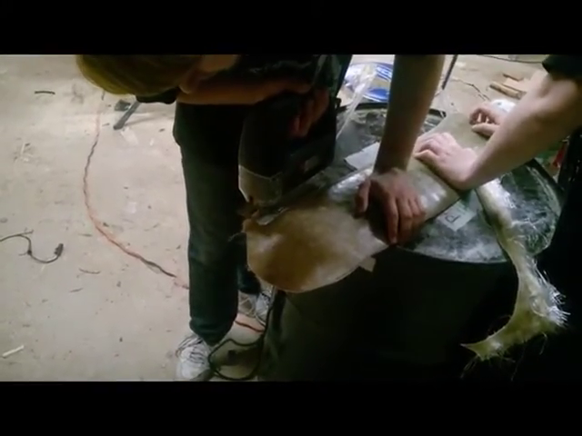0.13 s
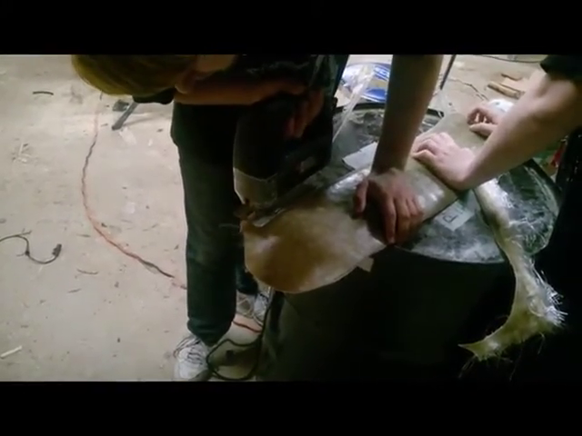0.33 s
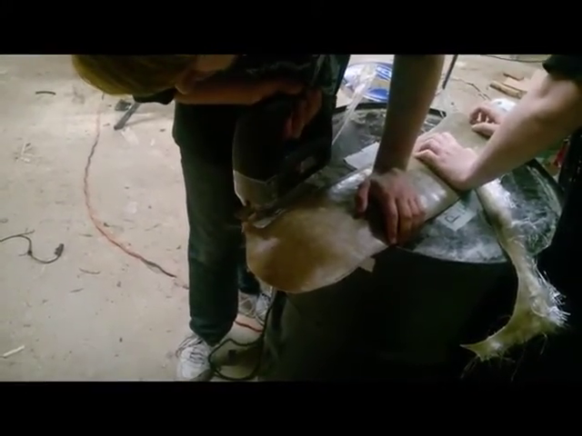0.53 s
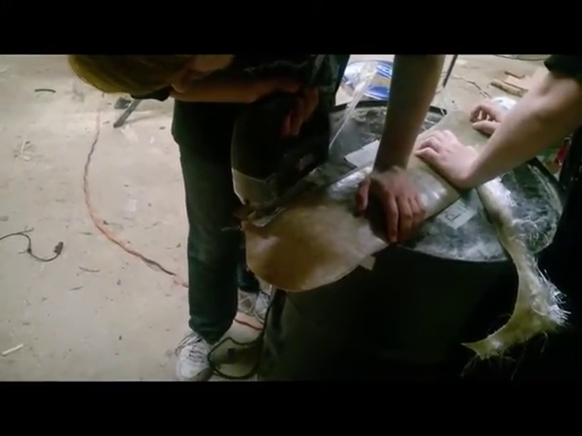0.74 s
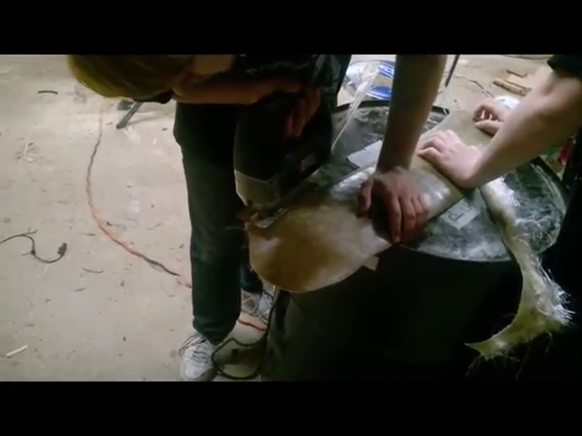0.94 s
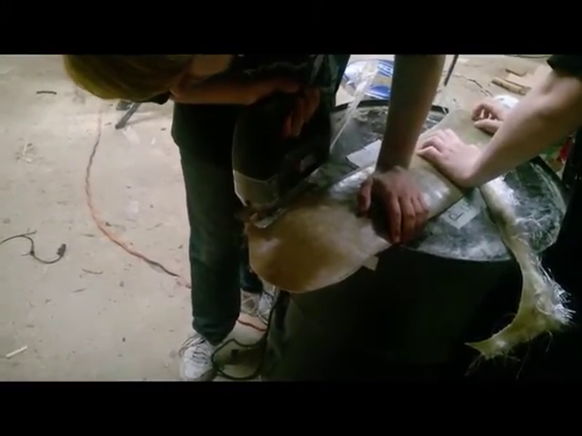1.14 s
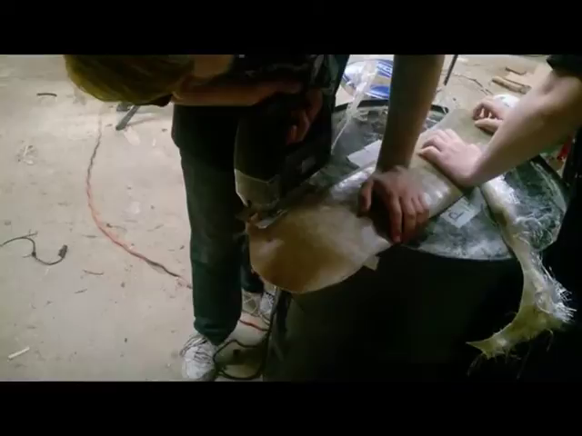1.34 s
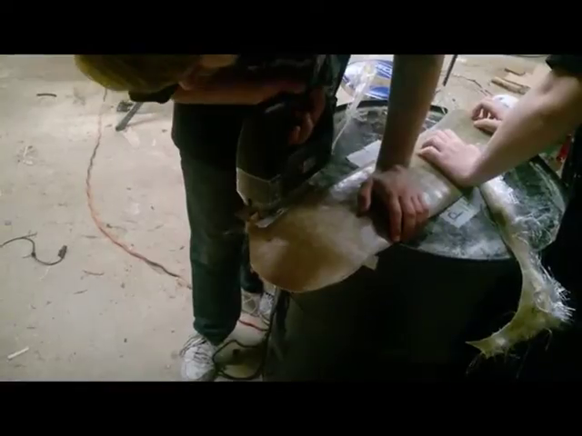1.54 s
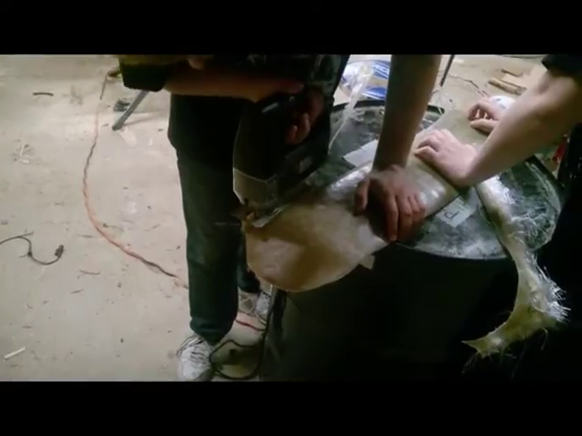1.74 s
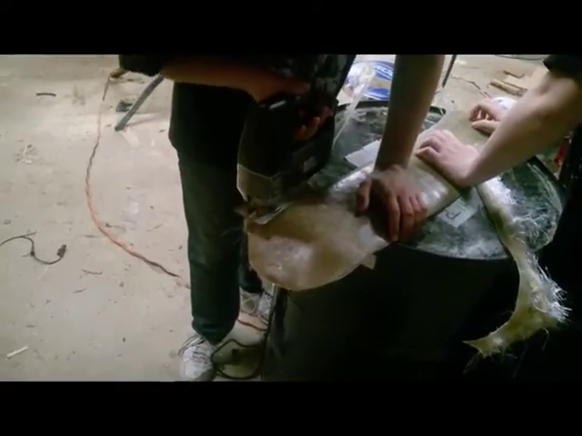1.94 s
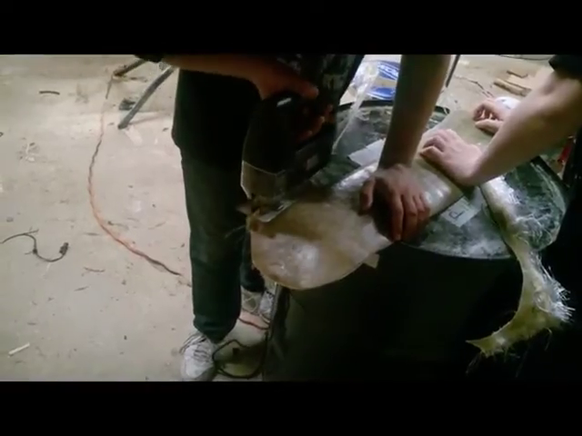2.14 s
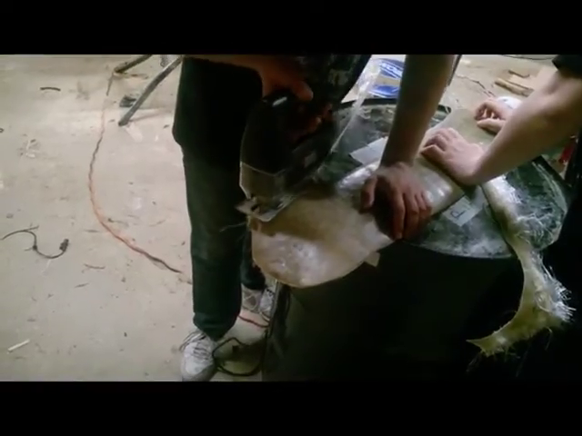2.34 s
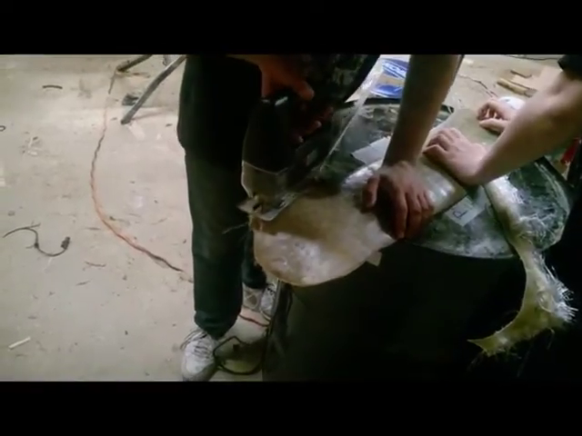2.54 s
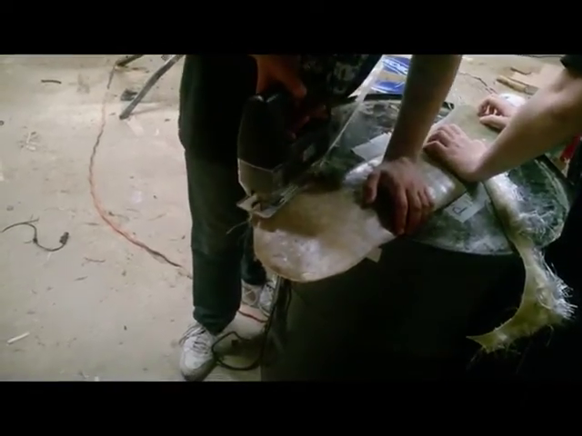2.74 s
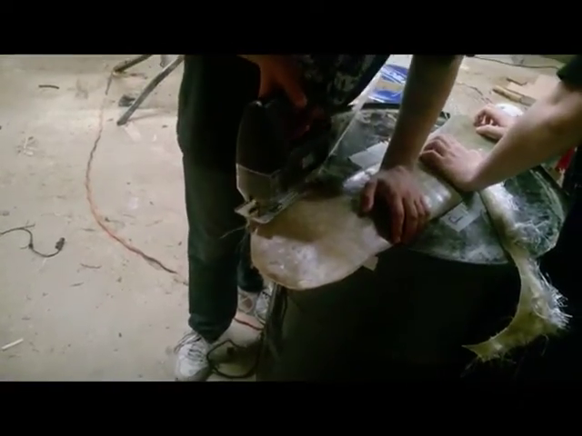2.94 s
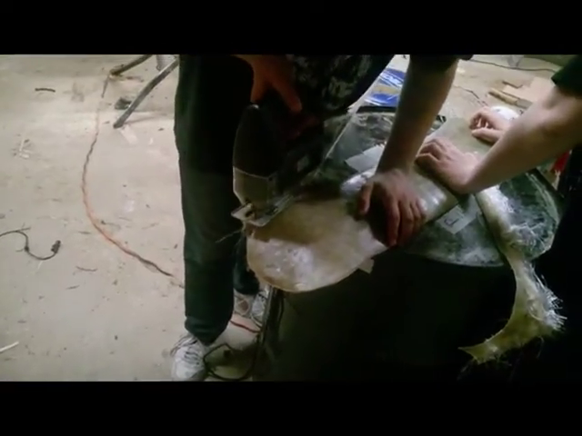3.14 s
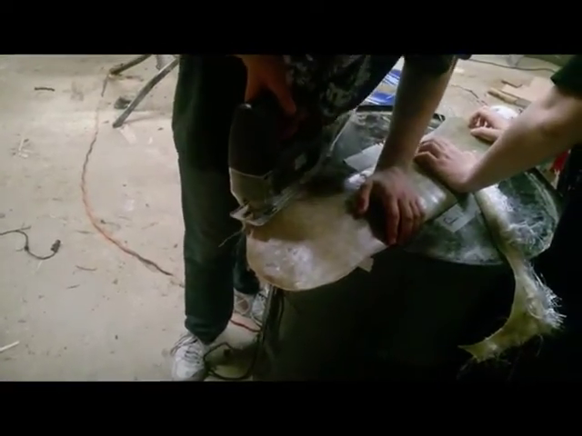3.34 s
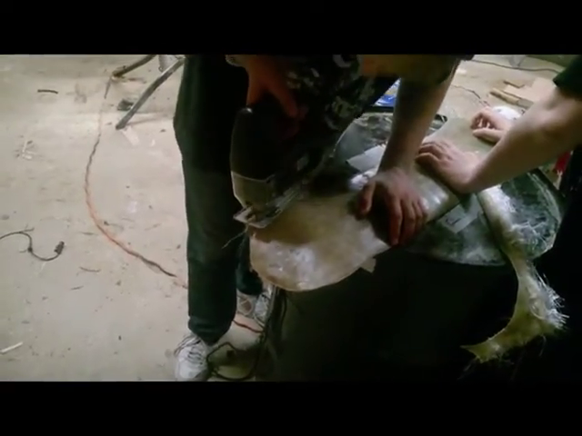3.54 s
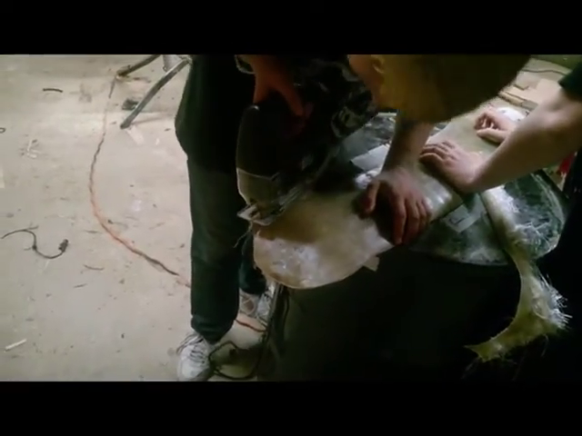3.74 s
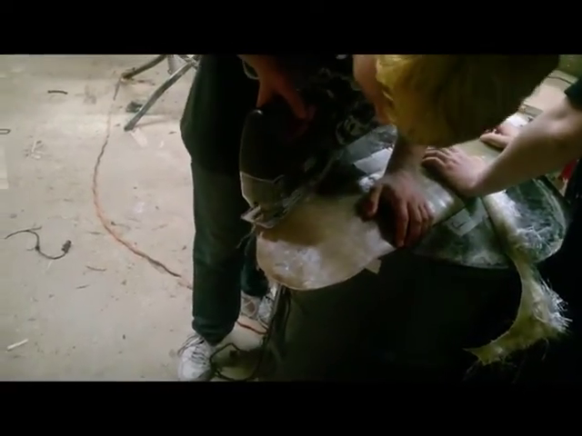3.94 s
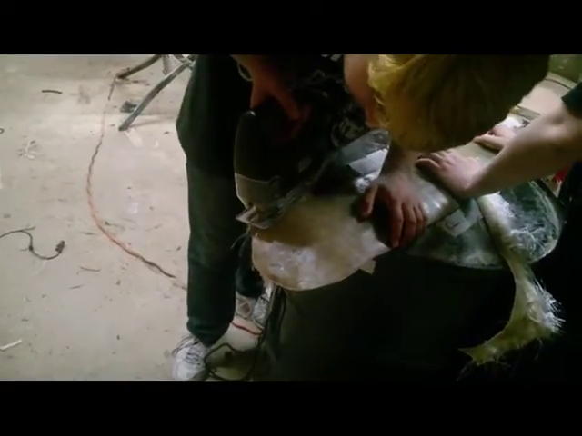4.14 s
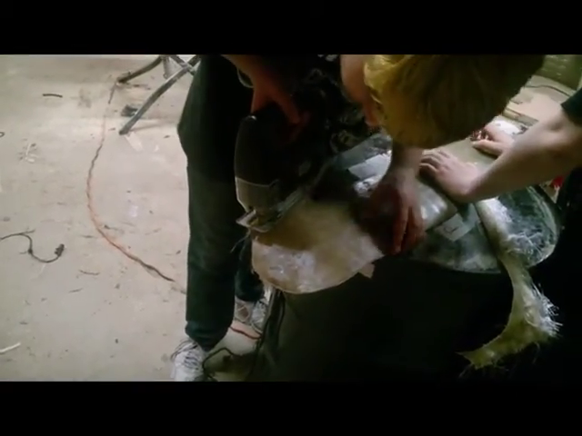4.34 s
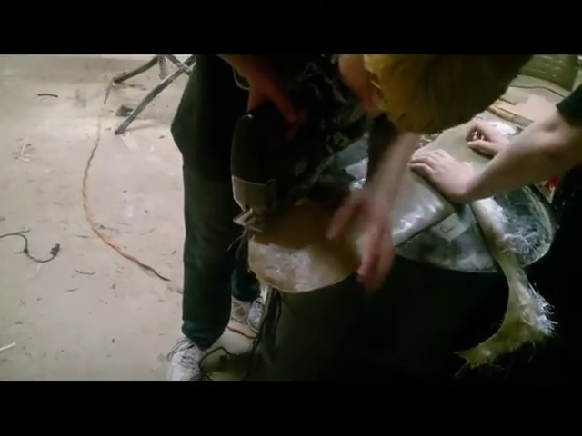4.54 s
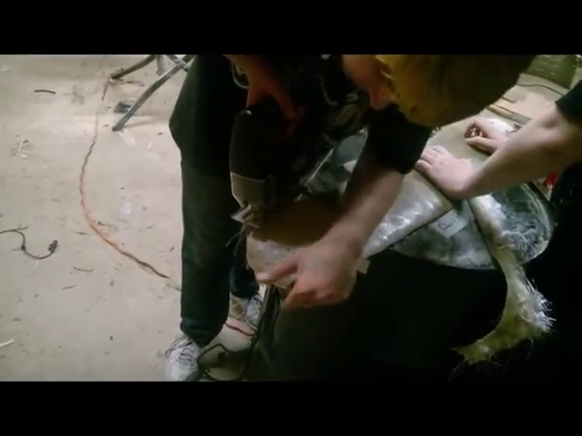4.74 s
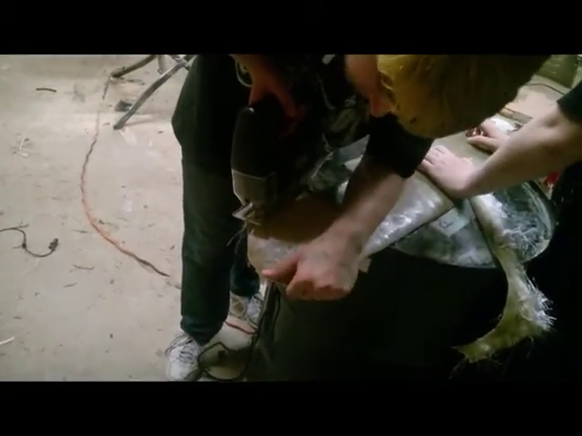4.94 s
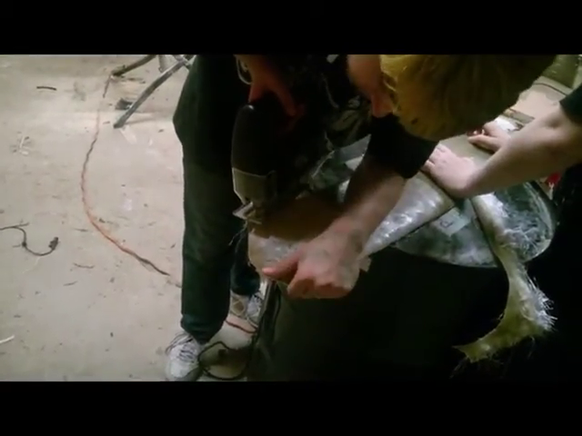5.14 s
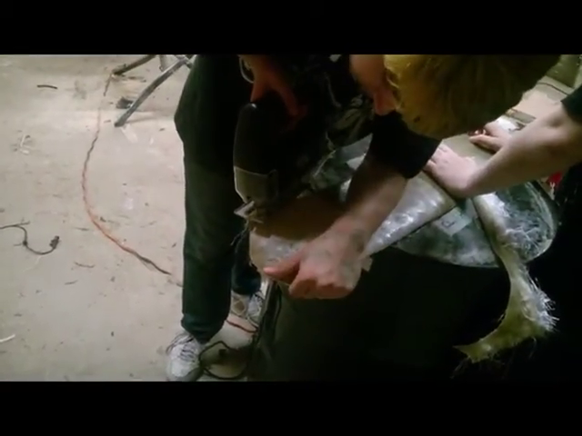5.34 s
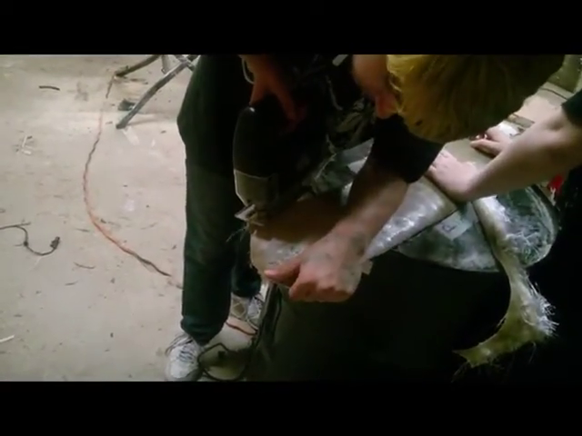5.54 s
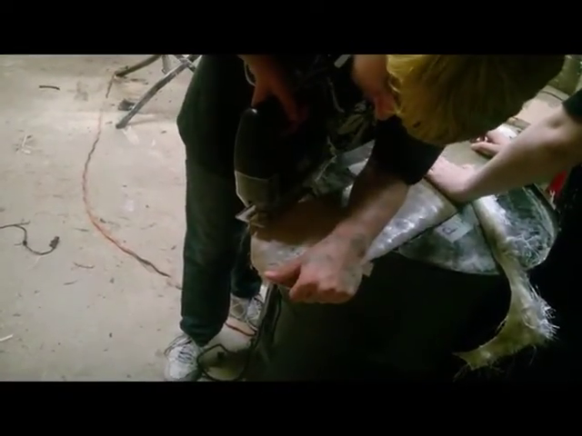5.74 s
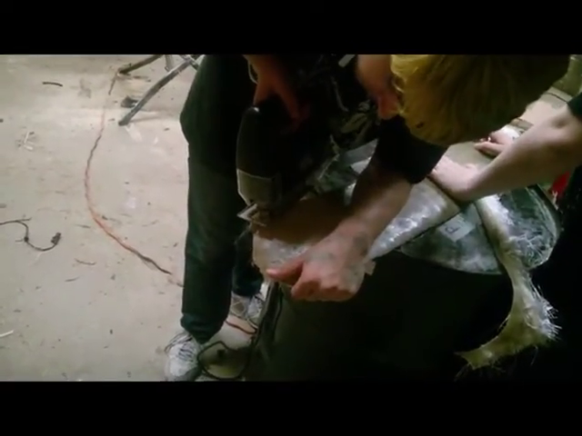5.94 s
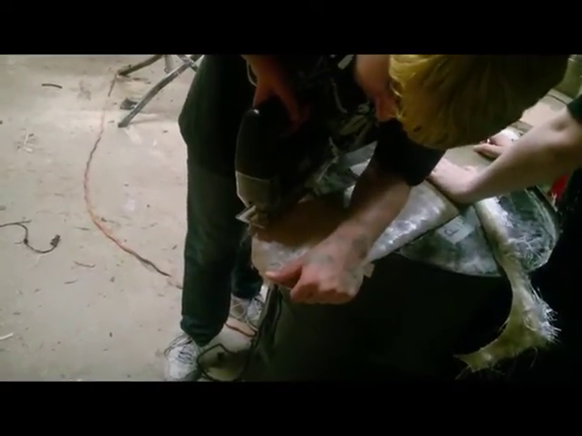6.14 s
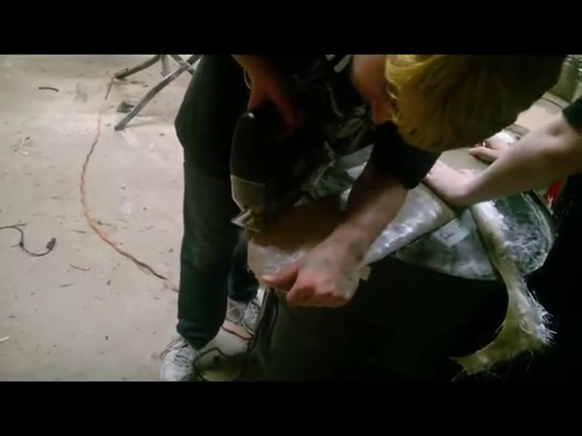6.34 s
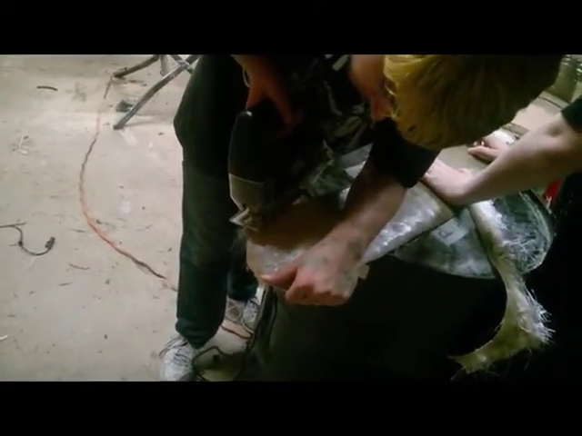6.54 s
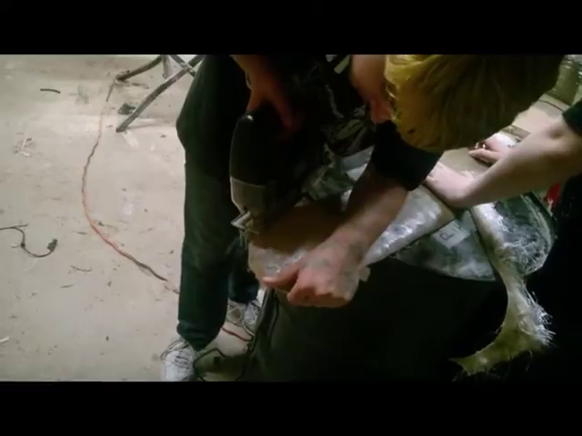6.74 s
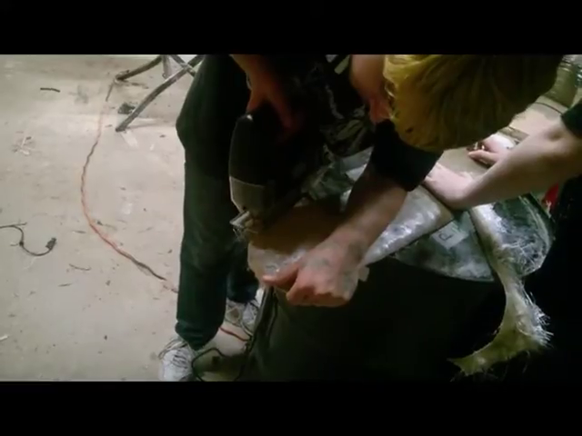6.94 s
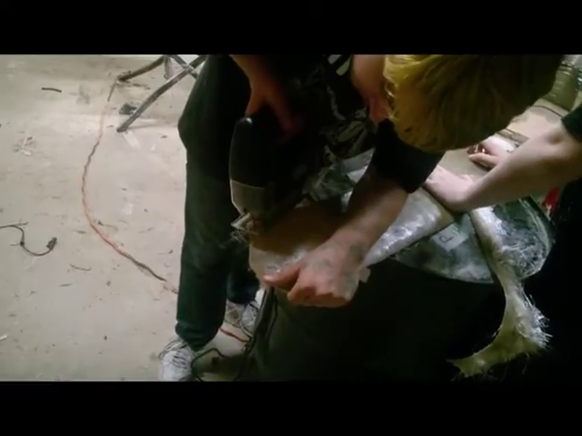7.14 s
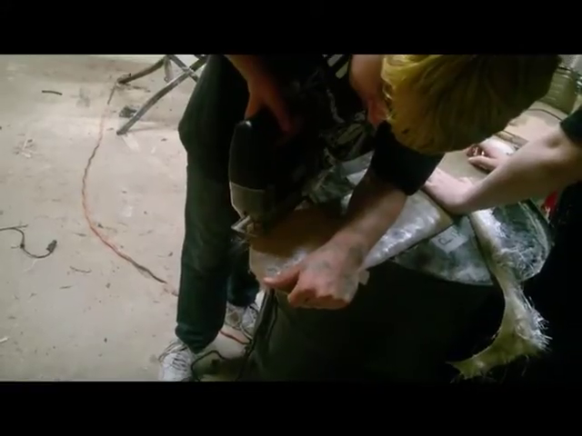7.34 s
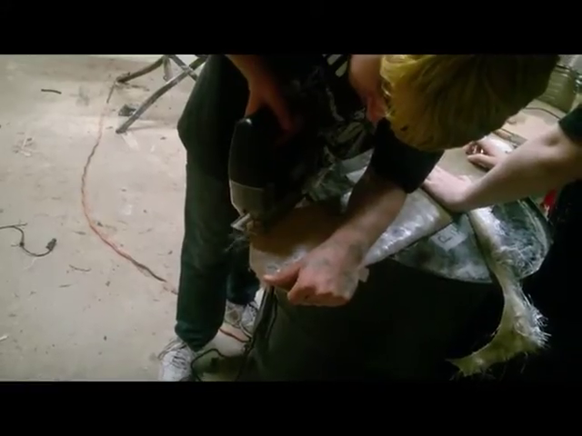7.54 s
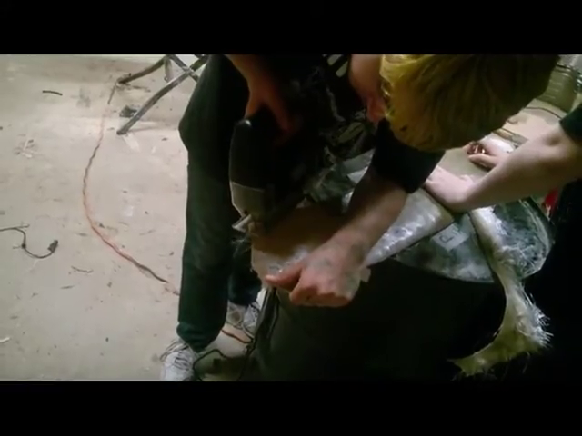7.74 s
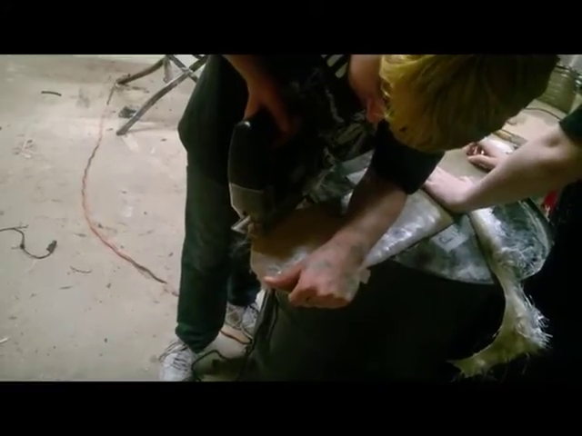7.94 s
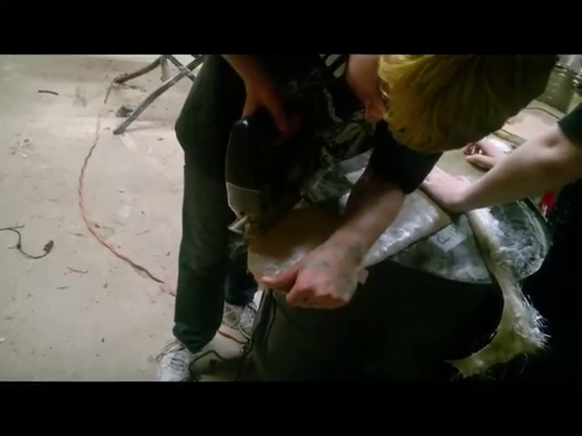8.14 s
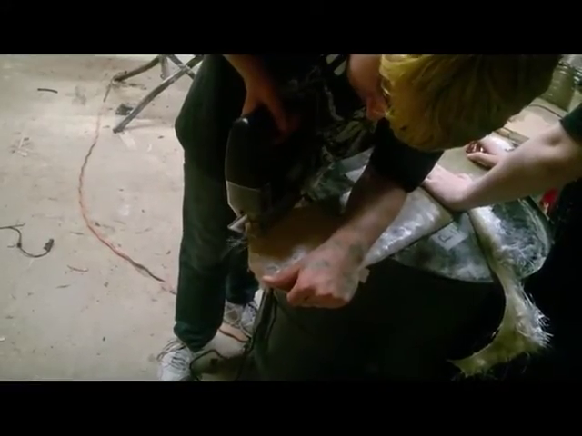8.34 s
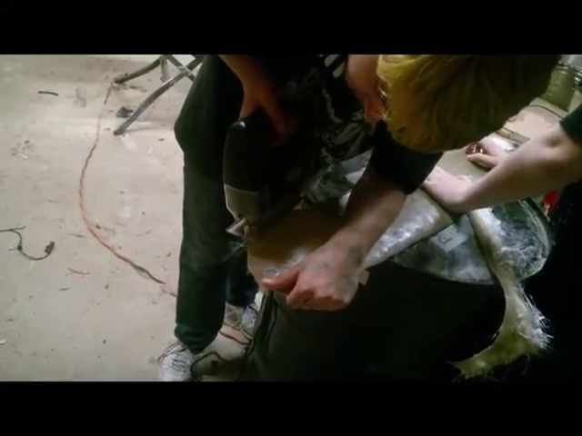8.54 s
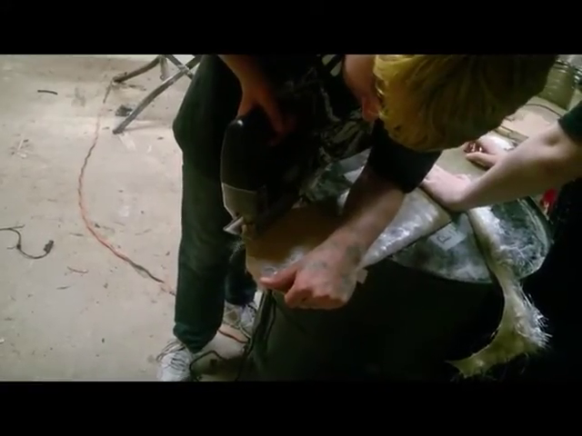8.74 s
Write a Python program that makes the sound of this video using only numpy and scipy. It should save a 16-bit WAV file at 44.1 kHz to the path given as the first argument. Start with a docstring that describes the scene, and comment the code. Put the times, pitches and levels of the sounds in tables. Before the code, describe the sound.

An electric jigsaw chatters through a hard fibreglass board, winds down with slowing knocks, pauses briefly, then starts cutting again.

```python
"""An electric jigsaw cuts a fibreglass board in a workshop, about 54 strokes a second. The teeth rattle
the board, the shoe (the saw's base plate) slaps it and its underside thrums, while the gears whine, the
fan hisses and the bench shudders. At 1.25 s the trigger is let go: the saw coasts, its blade knocking in
the slot, until it sticks at 3.7 s. The pause holds a faint scuff and the click of the trigger.
At 5.23 s the saw starts again, knocks a few times as it speeds up, and cuts on to the end."""
import sys
import numpy as np
from scipy import signal
from scipy.fft import rfft, irfft, next_fast_len
from scipy.io import wavfile
from scipy.ndimage import uniform_filter1d

SR = 44100
rng = np.random.default_rng(int(sys.argv[2]) if len(sys.argv) > 2 else 0)


def digitize_waveform(pressure):
    """Quantize a signal to 16-bit integers and store it at the path in sys.argv[1].

    Rows of a 2-D input are taken as channels; values are limited to [-1, 1].
    """
    field = np.atleast_2d(pressure).T
    bounded = np.clip(field, -1, 1)
    quanta = np.round(bounded * 32767).astype(np.int16)
    wavfile.write(sys.argv[1], SR, quanta)


N = 387198
TIME = np.arange(N) / SR
OFF_S, ON_S = 1.249, 5.23   # trigger let go, pressed again
FULL_SPEED = 54   # strokes a second; one stroke is one turn of the crank
BITE_AT = .76   # the teeth bite hardest about this many turns after the shoe slaps

# Speed under power, higher when the saw is pushed less. Each row: time in seconds, strokes a second.
POWERED_SPEED = [(0, 54.13), (1.25, 53.98), (6.6, 53.89), (7.05, 53.97), (7.35, 54.78), (7.65, 54.69),
                 (7.95, 55.15), (8.35, 54.4), (8.78, 54.18)]
def crank():
    """Speed and turns of the crank that drives the blade: powered, coasting, then speeding up again."""
    held = in_time(POWERED_SPEED)[0]
    friction, fan_drag = 10.36, .01109   # speed lost each second = friction + fan_drag * speed ** 2
    jam_s, jam_fade_s = 3.72, .17   # the slow blade sticks in the slot
    balance = np.sqrt(friction / fan_drag)   # speed at which both losses are equal
    left = np.arctan(held[int(OFF_S * SR)] / balance) - np.sqrt(friction * fan_drag) * (TIME - OFF_S)
    coasting = balance * np.tan(np.clip(left, 0, 1.5)) * np.exp(-np.maximum(TIME - jam_s, 0) / jam_fade_s)
    since = np.maximum(TIME - ON_S, 0)
    kick_share, kick_s, climb_s = .275, .02421, .2487   # a quick kick, then a slower climb
    climbing = held * (1 - kick_share * np.exp(-since / kick_s) - (1 - kick_share) * np.exp(-since / climb_s))
    speed = np.select([TIME < OFF_S, TIME < ON_S], [held, coasting], climbing)
    turns = np.cumsum(speed) / SR
    to_rest_angle = (.64 - turns[int(ON_S * SR)]) % 1   # the restart begins .64 of the way round
    return speed, turns + (TIME >= ON_S) * to_rest_angle


def teeth(stroke, speed):
    """Force of the cut: the same teeth meet the board every stroke, slowly wearing, plus fresh chips."""
    size, wear = 816, TIME / .35   # points in a stroke's pattern; it blends into a new one every .35 s
    patterns = rng.standard_normal((int(wear[-1]) + 2, size)) * from_db(7.5 * rng.standard_normal((1, size)))
    row, place, blend = wear.astype(int), (stroke % 1 * size).astype(int), wear % 1 * np.pi / 2
    repeating = rms_one(np.cos(blend) * patterns[row, place] + np.sin(blend) * patterns[row + 1, place])
    chips = rms_one(noise() * from_db(4 * noise()))
    strengths = from_db(.99 * rng.standard_normal(int(stroke[-1]) + 3))
    per_stroke = strengths[(stroke + 1.5 - BITE_AT).astype(int)]
    cutting = np.clip(speed / FULL_SPEED, 0, 1) ** 3.6   # a coasting blade only rubs
    rub = .5 - .1 * cutting * (TIME > ON_S)   # the second cut rubs less and bites harder
    bite = np.where(TIME > ON_S, 2.2, 1.2) * stroke_pulse(stroke, BITE_AT - .03, 10)
    light_bite = .1 * stroke_pulse(stroke, BITE_AT + .4, 5)
    return (rub + cutting * per_stroke * (bite + light_bite)) * (.51 * cutting * repeating + .99 * chips)


# The pitches at which the board rings. Each row: pitch in Hz, width in Hz (wider dies away sooner),
# then its level in dB at each of the three times in BLADE_PLACES_S.
BOARD_RINGS = [(565, 62, -8.5, -2.5, 0.5), (731, 50, -8.5, 7, -37), (883, 140, -13, 1, 2.5),
               (1016, 63, -1, 6, 5), (1178, 70, 1, 0, 6), (1395, 46, 0.5, -9.5, 15),
               (1655, 98, -5.5, -24, 7), (1880, 53, 0.5, -1.5, 11), (2028, 150, -3.5, -9.5, 5),
               (2221, 91, 1.5, 3, 8), (2340, 44, 0.5, -19.5, -23), (3140, 215, 1.5, -5, -4),
               (4060, 790, -23, -45, -24), (6950, 810, -14, -40.5, -2.5)]
BLADE_PLACES_S = [2.1, 4.5, 8.88]   # times in seconds when the blade reaches three places along the cut
# The tone of the teeth's broad rasp. Each row: pitch in Hz, level in dB.
RASP_TONE = [(180, -50.5), (300, -30.5), (541, -16), (647, -14.5), (775, -2.5), (1820, -7), (3120, -6),
             (5530, -13.5), (15000, -30.5)]
def board(force, rasp_db):
    """A force makes the board rasp and ring; the mix of rings changes as the blade moves along."""
    sound = from_db(rasp_db) * colour(force, RASP_TONE)
    for k, (hz, width_hz, *db) in enumerate(BOARD_RINGS):
        gain = from_db(np.interp(TIME, BLADE_PLACES_S, db))
        sound += (-1) ** k * gain * resonance(force, hz, width_hz)
    return sound


# The pitches at which the shoe rings. Each row: pitch in Hz, width in Hz, level in dB.
SHOE_RINGS = [(1150, 300, 0), (2300, 800, -9), (5300, 900, -11), (7100, 500, -11), (11000, 900, -20)]
def shoe_slaps(stroke, slap_db):
    """Once a stroke the shoe hits the board: a push, a quick rebound, a short ring and a rattle."""
    at = np.flatnonzero(np.diff(np.floor(stroke)) > 0)
    hits = np.zeros(N)
    hits[at] = from_db(slap_db[at] + 1.6 * rng.standard_normal(len(at)))
    t = np.arange(int(.006 * SR)) / SR
    push = np.exp(-((t - .0002) / .00007) ** 2)
    rebound = .5 * np.exp(-((t - .0011) / .00009) ** 2)
    ring = sum(from_db(db) * np.exp(-np.pi * width_hz * t) * np.cos(2 * np.pi * hz * (t - .0002))
               for hz, width_hz, db in SHOE_RINGS) * (t > .0001)
    slap = keep_band(.4 * (push + rebound) + .55 * ring, "high", 350)
    rattle = np.convolve(hits, np.exp(-t / .0024))[:N] * noise()
    return 1.25 * np.convolve(hits, slap / slap.max())[:N] + from_db(6) * board(rattle, rasp_db=-7)


# Knocks as the saw slows down or picks up. Each row: time in seconds, relative level in dB.
BLADE_KNOCKS = [(1.581, -13), (1.603, -9), (1.63, -22), (1.655, -6.5), (1.679, -11), (1.704, -11),
                (1.73, -10), (1.759, -9), (1.785, -7), (1.812, -7), (1.839, -9), (1.873, -10), (1.902, -6),
                (1.914, -14), (1.964, -5.5), (1.977, -17.5), (2.024, -9.5), (2.056, -7.5), (2.09, -16.5),
                (2.126, -15.5), (2.159, -17.5), (2.195, -11.5), (2.386, -21.5), (2.411, -27), (2.43, -11.5),
                (2.476, -11.5), (2.518, -14), (2.567, -10.5), (2.657, -18), (2.719, -18), (2.743, -17.5),
                (2.776, -12.5), (2.837, -14), (2.902, -14.5), (2.969, -16), (3.014, -21.5), (3.046, -21.5),
                (3.092, -23.5), (3.131, -18.5), (3.186, -22), (3.232, -19.5), (3.294, -23.5),
                (3.347, -21.5), (3.43, -28), (3.477, -24.5), (5.275, -19.5), (5.326, -14), (5.359, -10),
                (5.388, -17), (5.419, -15.5), (5.446, -17)]
def blade_knocks(speed):
    """The blade knocks on the board and its teeth scrape the slot; a slow blade is duller and longer."""
    rows = [(s, db, (FULL_SPEED / speed[int(s * SR)]) ** .31) for s, db in BLADE_KNOCKS]
    force = bursts([(s - .003, db, .0041 * stretch ** .5, .027 * stretch) for s, db, stretch in rows])
    scrape = bursts([(s - .013, db - 15.5, .013, .089 * stretch) for s, db, stretch in rows])
    hard, soft = (keep_band(force, "low", hz, order=1) for hz in (7000, 4000))
    hardness = np.clip(speed / 51, 0, 1)
    knock = board(hardness * hard + 1.29 * (1 - hardness) * soft, rasp_db=-3)
    return from_db(13.5) * (knock + from_db(1.5) * colour(scrape, HISS_TONE))


# The thrum for each way the board is held. Each row: start in seconds, then the levels in dB
# of the tones at 2, 3, 4 and 5 times the stroke rate.
THRUM_HOLDS = [(0, -47.5, -35.5, -37, -35.5), (.3, -47, -30.5, -41.5, -40.5),
               (1.25, -48, -34.5, -31.5, -35.5), (1.4, -49, -45, -36.5, -40.5), (1.7, -90, -90, -93, -90),
               (5.45, -50, -58, -48, -43), (6.09, -37.5, -42, -30.5, -44), (6.55, -39.5, -42, -35, -45),
               (6.86, -39, -52, -30.5, -43), (7.09, -61, -34.5, -43, -34.5), (7.41, -41, -35, -35, -57),
               (7.66, -54, -41, -48, -34.5), (8.03, -43, -35.5, -35.5, -47), (8.4, -45, -34.5, -36.5, -52)]
def board_thrum(turns):
    """The board's underside gives off low tones, whose levels glide from one hold to the next."""
    starts, *levels_db = np.transpose(THRUM_HOLDS)
    hold = np.searchsorted(starts, TIME, "right") - 1
    regrip_s = .08
    gains = [uniform_filter1d(from_db(db)[hold], int(regrip_s * SR)) for db in levels_db]
    return crank_tones(turns, np.arange(2, 6), 20 * np.log10(np.abs(gains) + 1e-9), waver_db=1.5)


# Tones at 6 to 24 times the stroke rate. Each row: relative level in dB in the first cut, in the second.
BUZZ_TONES = [(-14, -22), (-9, -8.5), (-23, -26), (-15.5, -11.5), (-7.5, -14), (-9, -7), (-20, -39),
              (-16.5, -9), (0, -4), (-5, -13.5), (-8.5, 1.5), (-5.5, -7), (-12, -4.5), (-5, -8), (-15, -32),
              (-9, -6.5), (-1, -13), (-7, 3), (-14.5, -26)]
def cutting_buzz(turns, speed):
    """Whatever repeats exactly from stroke to stroke makes a clean buzz, only near full speed."""
    levels_db = [np.where(TIME > ON_S, second, first) for first, second in BUZZ_TONES]
    tones = crank_tones(turns, np.arange(6, 25), levels_db, waver_db=2.2)
    return np.clip(speed / FULL_SPEED, 0, 1) ** 12 * tones


# The hiss of fan, brushes and gears; it also shapes the scrapes and the small sounds in the pause.
# Each row: pitch in Hz, level in dB.
HISS_TONE = [(180, -48), (300, -23), (517, -13.5), (907, -2.5), (985, -3), (2140, -6.5), (2440, -7.5),
             (5570, -8), (6680, -16), (8700, -19), (15500, -32.5)]
def motor_hiss(stroke, speed, board_db):
    """Fan and brushes hiss, louder with speed and hard cutting; the highs fade first as they slow."""
    hiss = colour(noise() * (.8 + .29 * stroke_pulse(stroke, BITE_AT + .05, 3.3)), HISS_TONE)
    highs, lows = keep_band(hiss, "high", 8000), keep_band(hiss, "low", 8000)
    brightness = np.clip(speed / FULL_SPEED, 0, 1) ** .69
    level_db = -22.5 + .31 * (board_db - board_db[0]) + .72 * drift(12)
    return from_db(level_db) * (speed / FULL_SPEED) ** 1.17 * rms_one(lows - brightness * highs)


# Whine at 1, 2 and 3 times the rate at which the gear teeth meet.
# Each row: relative level in dB in the first cut, while coasting, in the second cut.
WHINE_TONES = [(-31, -40, -34), (-40, -54, -44), (-39, -37, -41)]
# The housing lets some pitches out more than others. Each row: pitch in Hz, boost or cut in dB.
HOUSING_TONE = [(1000, -50), (2750, -18), (3600, -20), (4150, -6), (4600, -13), (5250, -1), (5500, 0),
                (5850, -5), (6250, 4), (6600, 5), (6900, -5), (7350, -5), (7850, 3), (8250, -6)]
GEAR_TEETH, HOUSING_HZ, HOUSING_WIDTH_HZ = 51, 5404, 272
def gearbox(turns, stroke, speed):
    """The gears whine, swelling once a stroke; slack in the crank taps the housing and makes it ring."""
    hz, housing_db = np.transpose(HOUSING_TONE)
    multiples = GEAR_TEETH * np.arange(1, 4)
    whine_db = [np.select([TIME < OFF_S, TIME < ON_S], db[:2], db[2])
                + np.interp(k * speed, [0, *hz], [-99, *housing_db])
                for k, db in zip(multiples, WHINE_TONES)]
    swell = .8 + .5 * stroke_pulse(stroke, BITE_AT, 2.5)
    whine = swell * crank_tones(turns, multiples, whine_db, waver_db=1.6)
    tap = rms_one(np.diff(np.floor(stroke - BITE_AT), prepend=0))
    rattle = rms_one(noise() * stroke_pulse(stroke, BITE_AT + .044, 1.9))
    ring = evened(resonance(.68 * tap + .43 * rattle, HOUSING_HZ, HOUSING_WIDTH_HZ))
    return whine + from_db(-31.5) * (speed / FULL_SPEED) ** 3.5 * ring


# The tone of the bench's shudder. Each row: pitch in Hz, level in dB.
SHUDDER_TONE = [(53, -33), (90, -8.5), (119, -5.5), (308, 1), (397, -8), (492, -10), (600, -4), (780, -31),
                (1320, -120)]
# Jolts to the bench. Each row: time of the peak in seconds, relative shudder level in dB,
# thud level in dB, half length in seconds.
BENCH_JOLTS = [(0.906, -45, -54, 0.036), (1.52, -36, -41, 0.11), (1.927, -47, -40.5, 0.18),
               (2.62, -42, -42, 0.23), (2.87, -55, -46, 0.11), (3.388, -57, -56, .04),
               (4.336, -60.5, -78.5, .04), (4.911, -74, -57.5, 0.052), (5.338, -50.5, -42.5, 0.066),
               (6.39, -27, -42, 0.025), (6.604, -27, -36, 0.046), (7.52, -45, -57, .05),
               (8.314, -40, -51, .04), (8.468, -44, -53, .04), (8.59, -37, -57, .04)]
def bench(shudder_db):
    """The bench shudders dully and thuds at its lowest pitch; both swell at each jolt."""
    shudder_gain, thud_gain = from_db(shudder_db), from_db(shudder_db - 25)
    for s, jolt_db, thud_db, half_s in BENCH_JOLTS:
        swell = np.exp(-((TIME - s) / half_s) ** 2)
        shudder_gain += from_db(jolt_db) * swell
        thud_gain += from_db(thud_db) * swell
    shudder = from_db(1.3 * drift(10) - 6.5) * rms_one(colour(noise(), SHUDDER_TONE, size=16384))
    thud = evened(resonance(resonance(noise(), hz=66, width_hz=24), hz=66, width_hz=24))
    return shudder_gain * shudder + thud_gain * thud


# Small sounds in the pause. Each row: start in seconds, relative level in dB, rise in seconds,
# seconds to fade by 60 dB.
PAUSE_SOUNDS = [(4.28, -62, 0.046, 0.26), (4.66, -82, 0.038, 0.4), (5.15, -82, 0.0032, 0.07),
                (5.219, -70.5, 0.0018, 0.036)]
def scuff_and_trigger():
    """A faint scuff and the trigger's clicks, each a short puff of noise."""
    return from_db(20.5) * colour(bursts(PAUSE_SOUNDS), HISS_TONE)


def room_echo(x, fade_s=.4, wall_cut_hz=2500):
    """Eight echoes bounce between the walls, quieter and duller on every round."""
    size = next_fast_len(N + SR)
    delay = np.exp(-2j * np.pi * np.arange(size // 2 + 1) / size)   # a delay of one sample
    dull, echoes = np.exp(-2 * np.pi * wall_cut_hz / SR), 0
    for k, lag in enumerate((rng.uniform(.015, .04, 8) * SR).astype(int)):
        loop = from_db(-60 * lag / SR / fade_s) * (1 - dull) / (1 - dull * delay) * delay ** lag
        echoes = echoes + (-1) ** k * loop / (1 - loop)
    return irfft(rfft(x, size) * echoes, size)[:N]


# The tone of the quiet workshop. Each row: pitch in Hz, level in dB.
BACKGROUND_TONE = [(12, -29), (20, -1), (49, -5), (116, -13), (180, -23), (649, -32.5), (725, -40.5),
                   (4950, -41.5), (7730, -50), (15500, -46)]
def background():
    """A faint, steady low rumble lies under everything."""
    return from_db(-68.5) * rms_one(colour(noise(), BACKGROUND_TONE, size=16384))


def noise():
    """Fresh white noise for the whole scene."""
    return rng.standard_normal(N)


def from_db(db):
    """Turn decibels into a number to multiply by."""
    return 10 ** (np.asarray(db) / 20)


def rms_one(x):
    """Scale a signal so its average strength (rms) is 1."""
    return x / np.sqrt(np.mean(x ** 2) + 1e-20)


def evened(x, size=4410):
    """Even out slow changes in loudness."""
    power = uniform_filter1d(uniform_filter1d(x ** 2, size), size)
    return x / np.sqrt(np.maximum(power, 0) + 1e-12)


def in_time(rows):
    """Join a table's timed rows with straight lines, giving one curve a column."""
    s, *columns = np.transpose(rows)
    return [np.interp(TIME, s, c) for c in columns]


def drift(rate_hz):
    """A slow random wander, about 1 in size."""
    r = np.exp(-80 * np.pi * rate_hz / SR)
    slow = signal.lfilter([1], [1, -2 * r, r * r], rng.standard_normal(N // 40 + 2002))[2000:]
    return np.interp(np.arange(N) / 40, np.arange(len(slow)), rms_one(slow))


def colour(x, tone, size=4096):
    """Shape a sound with a tone table, so that nothing rings before its cause (minimum phase)."""
    hz, db = np.transpose(tone)
    grid = np.maximum(np.arange(size // 2 + 1) * SR / size, 1)
    cepstrum = irfft(np.interp(np.log(grid), np.log(hz), db) * np.log(10) / 20)
    cepstrum[1:size // 2] *= 2
    cepstrum[size // 2 + 1:] = 0
    return signal.oaconvolve(x, irfft(np.exp(rfft(cepstrum))))[:N]


def keep_band(x, side, hz, order=2):
    """Keep the "low" or the "high" side of a pitch."""
    return signal.sosfilt(signal.butter(order, hz, side, fs=SR, output="sos"), x)


def resonance(x, hz, width_hz):
    """Let a sound ring at one pitch."""
    r = np.exp(-np.pi * width_hz / SR)
    gain = (1 - r * r) / 2
    return signal.lfilter([gain, 0, -gain], [1, -2 * r * np.cos(2 * np.pi * hz / SR), r * r], x)


def stroke_pulse(turns, at, sharpness):
    """A smooth bump once a stroke, `at` turns into it."""
    return np.exp(sharpness * (np.cos(2 * np.pi * (turns - at)) - 1))


def bursts(rows):
    """Puffs of noise that swell and die away."""
    envelope = np.zeros(N)
    for s, db, rise_s, fade_s in rows:
        t, start = np.arange(int(fade_s * SR)) / SR, int(s * SR)
        envelope[start:start + len(t)] += from_db(db - 60 * t / fade_s) * np.minimum(t / rise_s, 1)
    return envelope * noise() + 1e-18


def crank_tones(turns, multiples, levels_db, waver_db):
    """Pure tones at multiples of the stroke rate, each wavering in level."""
    return sum(np.sqrt(2) * from_db(db + waver_db * drift(9))
               * np.sin(2 * np.pi * (k * turns + rng.random())) for k, db in zip(multiples, levels_db))


# Where in the crank's turn the shoe slaps. Each row: time in seconds, angle in turns.
SLAP_ANGLE = [(0, .62), (.5, .52), (.75, .52), (1.3, .6), (1.65, .55), (5.85, .4), (6.15, .51), (7.2, .54),
              (8.1, .535), (8.78, .64)]
# How hard the saw works. Each row: time in seconds, then relative levels in dB of the board under
# the blade, the shoe's slap and the bench's shudder.
EFFORT = [(0, -18.5, -8.5, -37), (.33, -19, -9.5, -35), (1.15, -18.5, -8.5, -43), (1.43, -17.5, -1, -31.5),
          (1.64, -22.5, -8, -30), (1.75, -30, -41, -31.5), (2.0, -31, -57.5, -33), (2.21, -38, -58, -36),
          (2.34, -37.5, -60, -40), (2.44, -31, -78, -43), (2.62, -30.5, -60, -43), (2.82, -33, -60, -38),
          (3.14, -40, -60, -33), (3.4, -43, -60, -38), (3.59, -47.5, -60, -40), (3.7, -39.5, -60, -39),
          (3.77, -56, -62.5, -47.5), (3.97, -59, -57.5, -56.5), (4.07, -73.5, -59.5, -55.5),
          (4.16, -85, -60, -86), (5.238, -86, -58, -89), (5.25, -35, -62, -40), (5.28, -31.5, -60, -37),
          (5.45, -30, -60, -34), (5.7, -27.5, -37, -33), (5.85, -26, -9, -43.5), (5.93, -20.5, -19, -37),
          (6.07, -19, -8.5, -37), (6.2, -19.5, -6, -34), (6.4, -19, -9.5, -27), (6.7, -19, -10.5, -28),
          (6.93, -17.5, -10, -40), (7.05, -17, -8.5, -38), (7.14, -24, -17, -29.5),
          (7.28, -30.5, -27.5, -39), (7.38, -23.5, -24, -36), (7.44, -21, -14, -32),
          (7.54, -20.5, -8.5, -30.5), (7.68, -26.5, -28, -37.5), (7.98, -27, -18, -41),
          (8.05, -18, -14.5, -33), (8.3, -20.5, -7, -32), (8.5, -22, -13.5, -33), (8.6, -20.5, -9, -34.5),
          (8.78, -23, -8, -28)]
def scene():
    """The crank sets the pace for the saw and board; the bench and the workshop sound behind them."""
    speed, turns = crank()
    stroke = turns - in_time(SLAP_ANGLE)[0] + 1   # turns counted from slap to slap
    board_db, slap_db, shudder_db = in_time(EFFORT)
    saw = from_db(board_db - 4.5 + drift(9.9)) * evened(board(teeth(stroke, speed), rasp_db=-3.5))
    saw += blade_knocks(speed) + motor_hiss(stroke, speed, board_db) + gearbox(turns, stroke, speed)
    saw += shoe_slaps(stroke, slap_db) + scuff_and_trigger()
    hum = board_thrum(turns) + from_db(board_db - 13.5) * cutting_buzz(turns, speed)
    return (saw + hum + background() + from_db(-14) * room_echo(saw) + bench(shudder_db))[None]


def record(dry):
    """Round off the loudest peaks and cut the highs above 15700 Hz."""
    high_cut = signal.ellip(12, .5, 60, 15700, fs=SR, output="sos")
    return signal.sosfilt(high_cut, 1.5 * np.tanh(dry / 1.5))


dry = scene()
out = record(dry)
digitize_waveform(out)
```